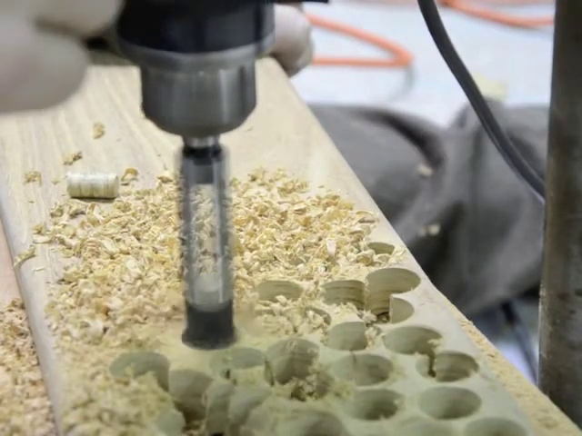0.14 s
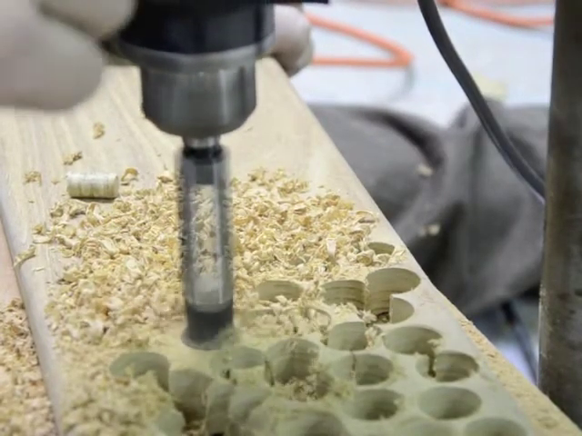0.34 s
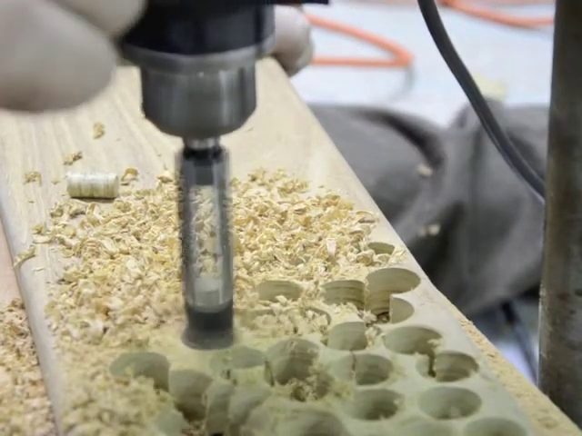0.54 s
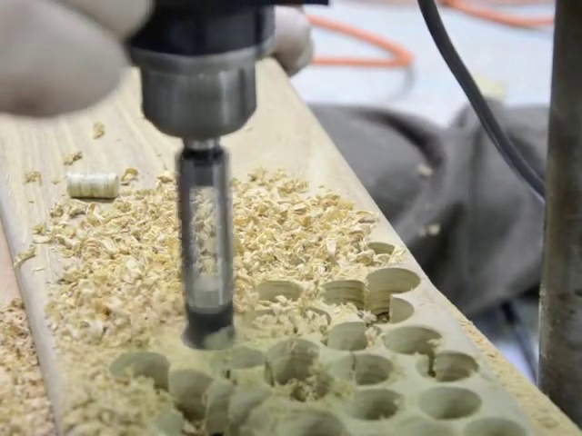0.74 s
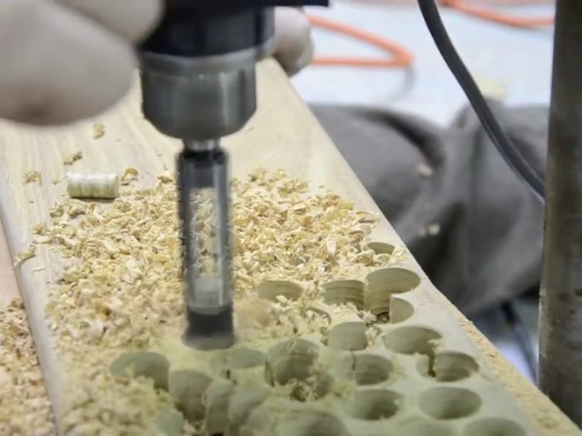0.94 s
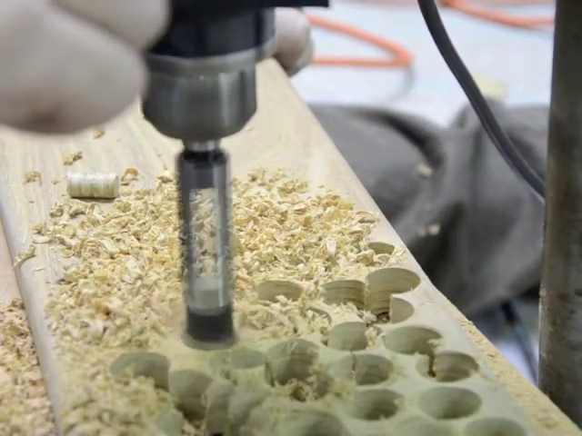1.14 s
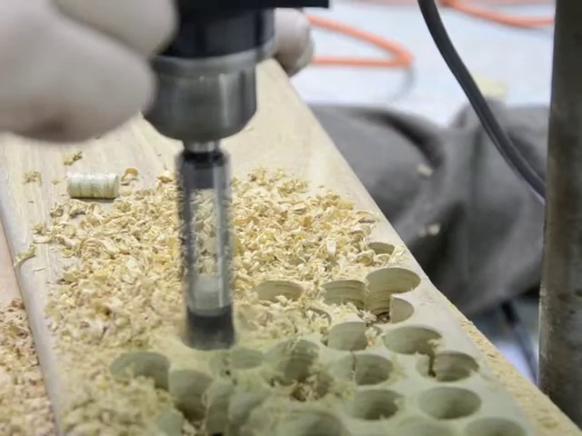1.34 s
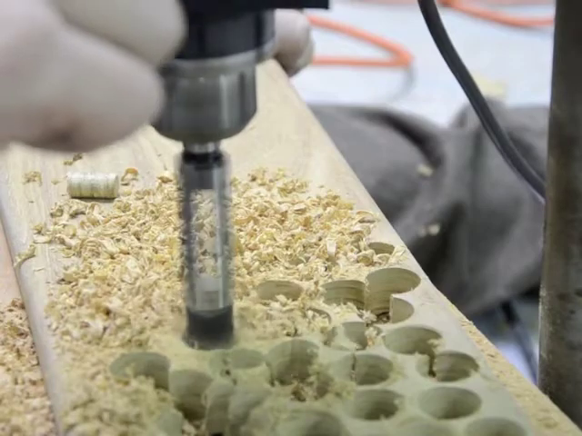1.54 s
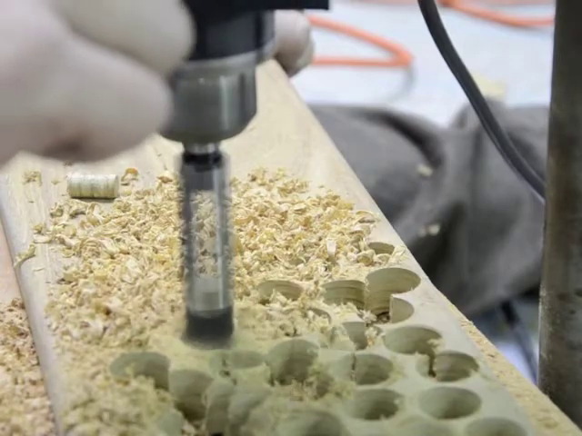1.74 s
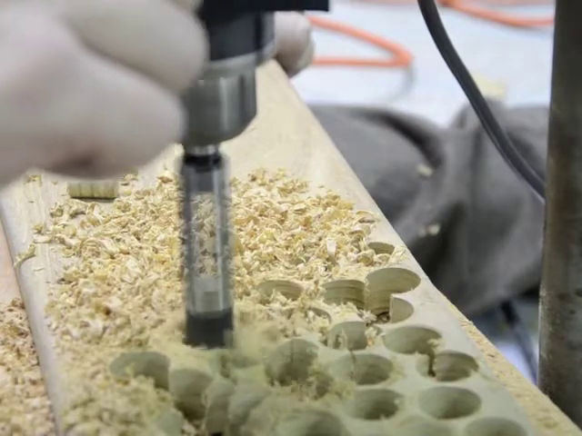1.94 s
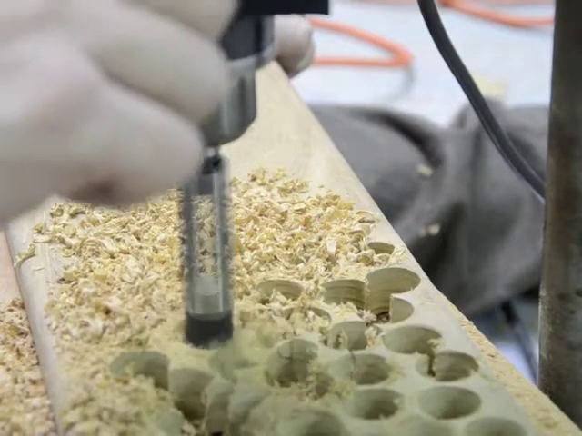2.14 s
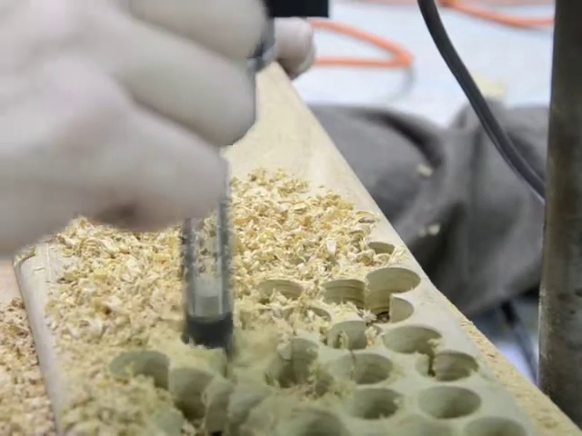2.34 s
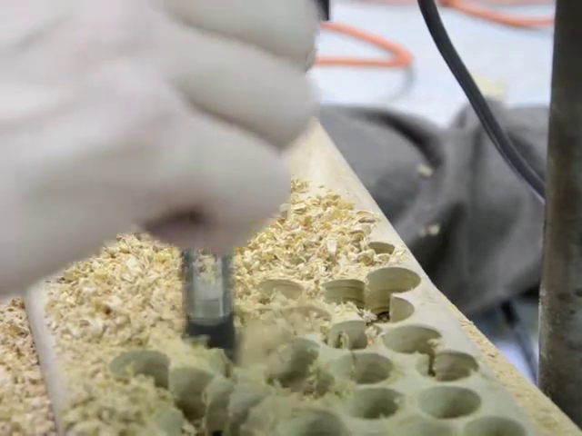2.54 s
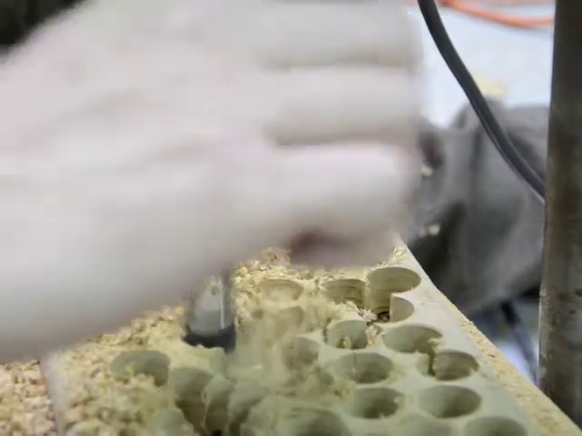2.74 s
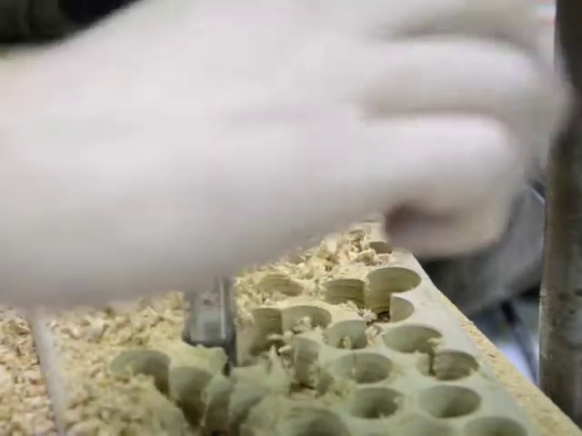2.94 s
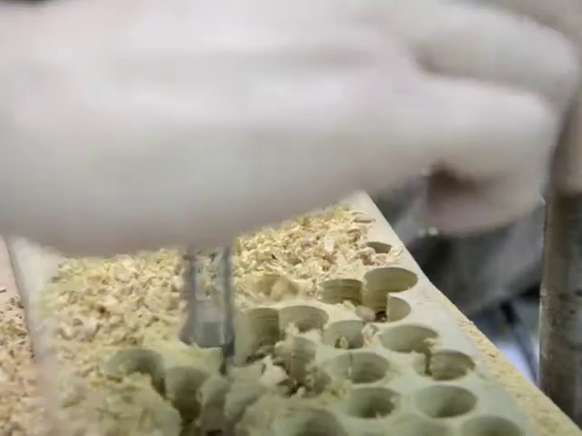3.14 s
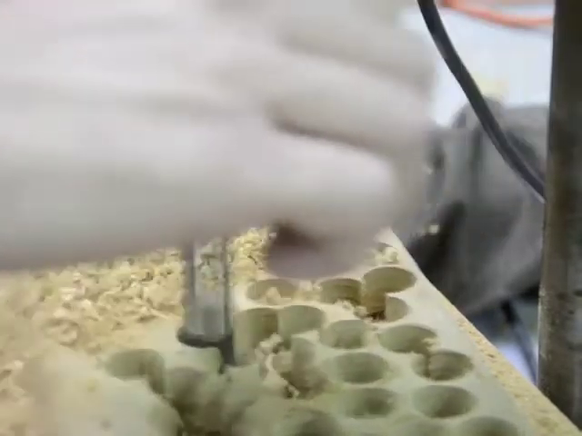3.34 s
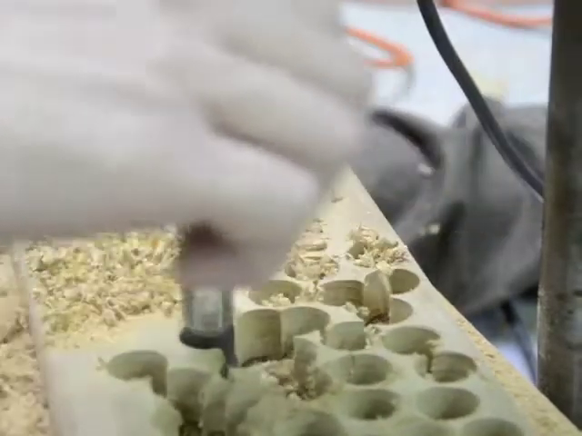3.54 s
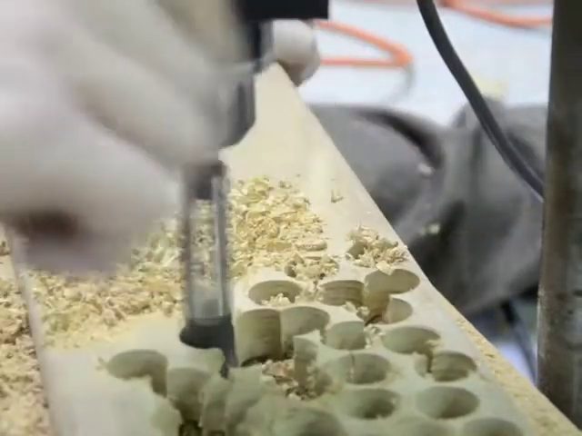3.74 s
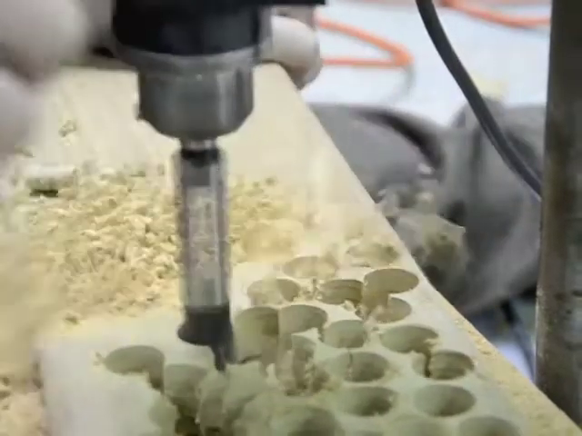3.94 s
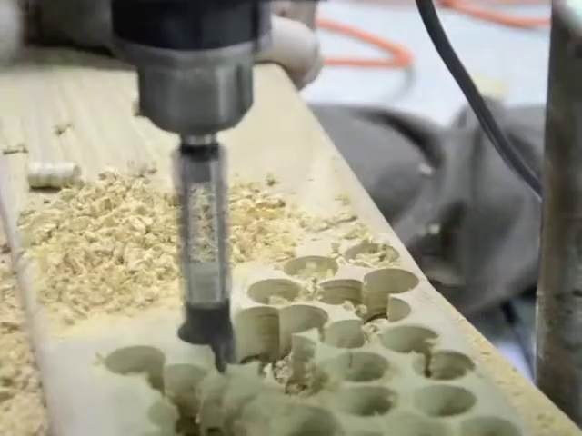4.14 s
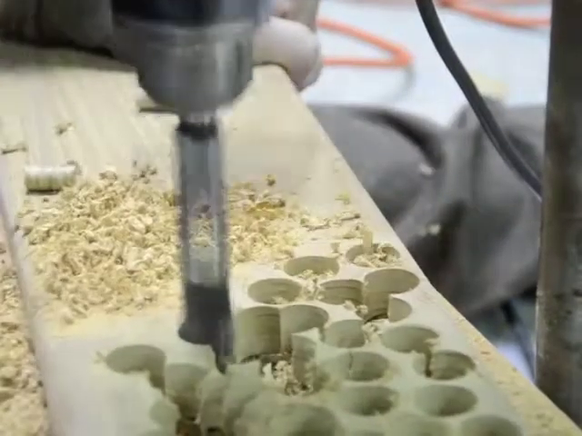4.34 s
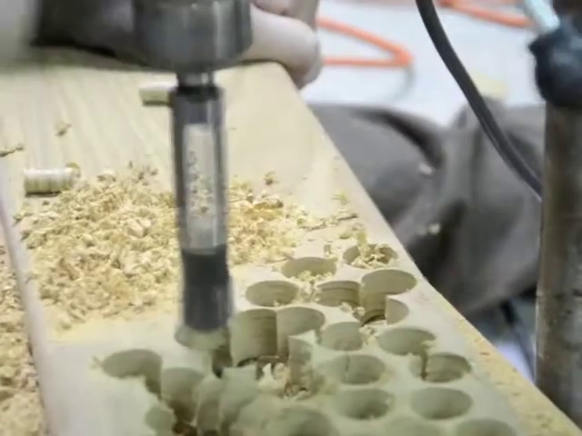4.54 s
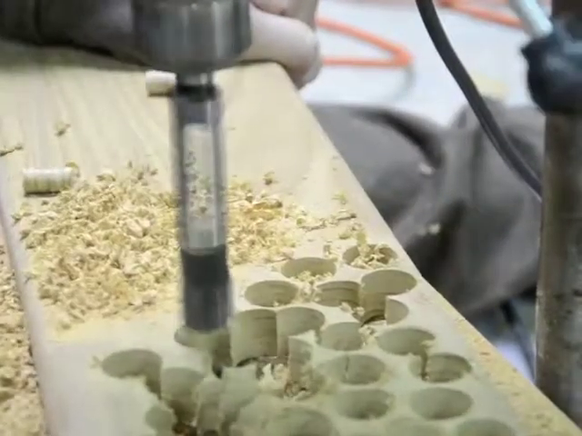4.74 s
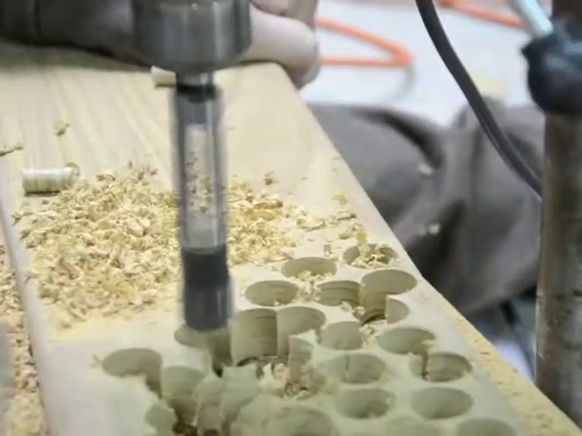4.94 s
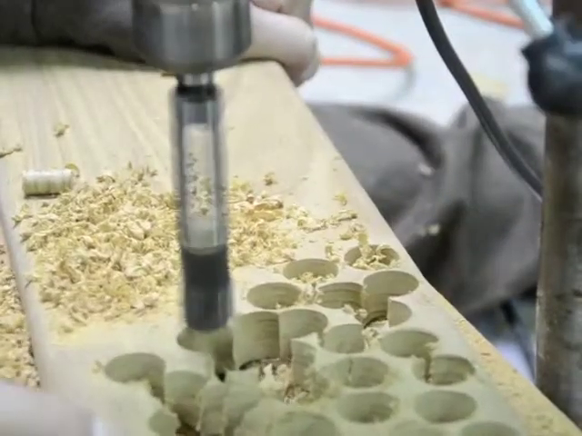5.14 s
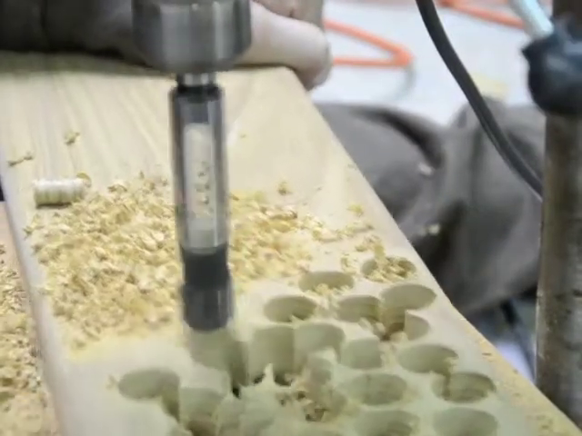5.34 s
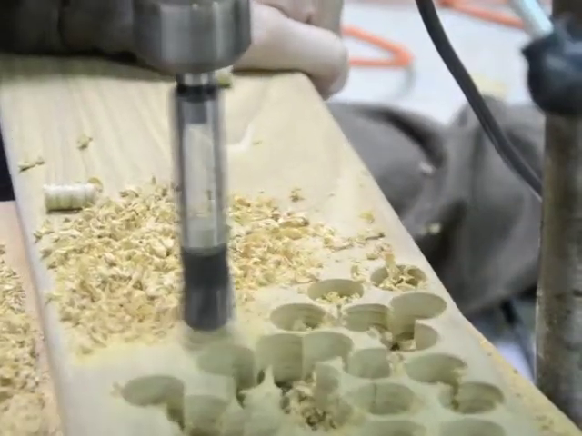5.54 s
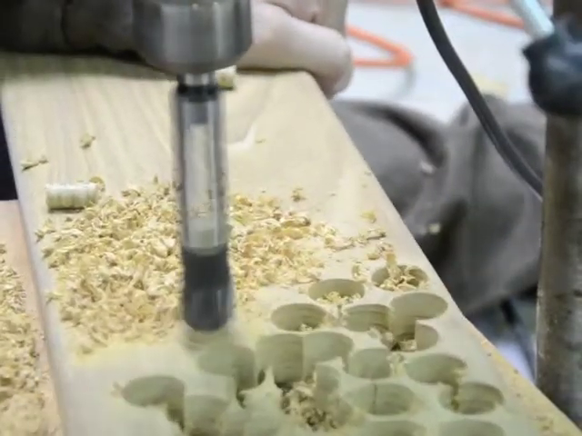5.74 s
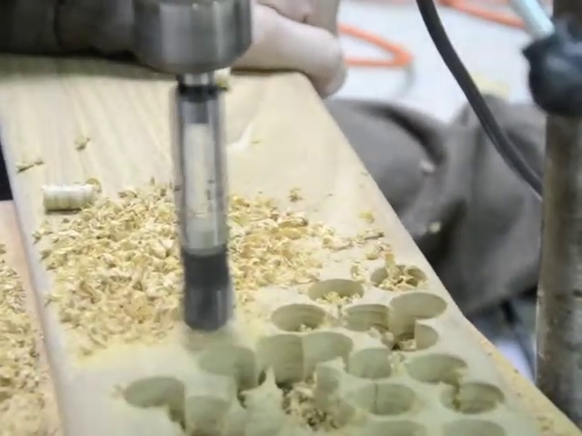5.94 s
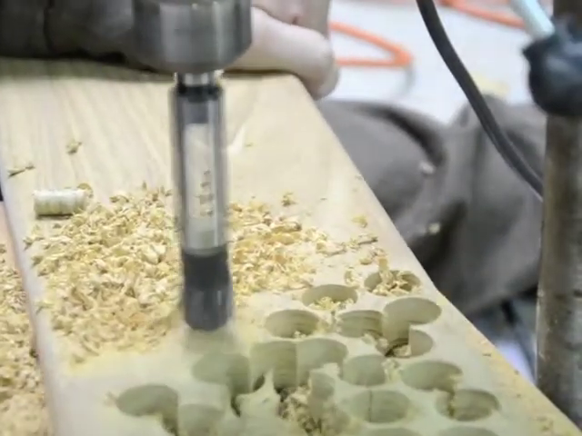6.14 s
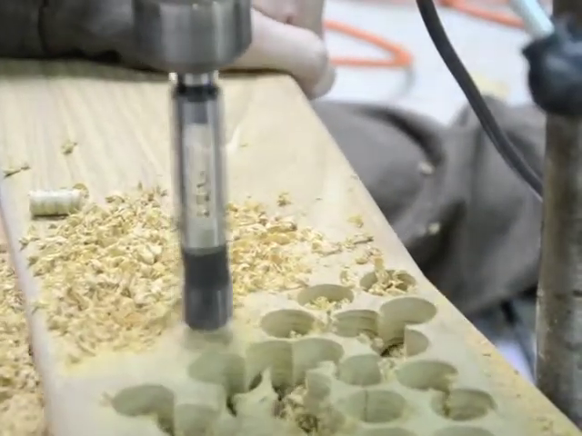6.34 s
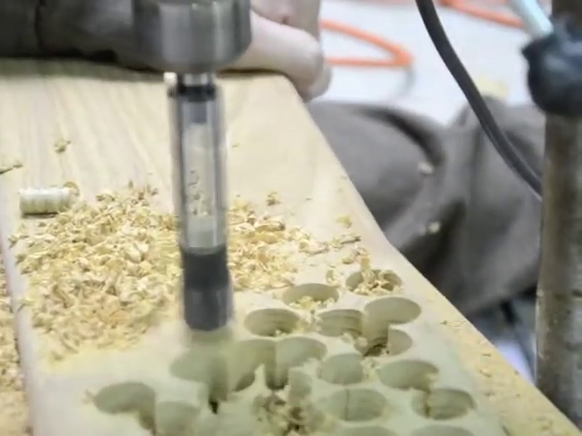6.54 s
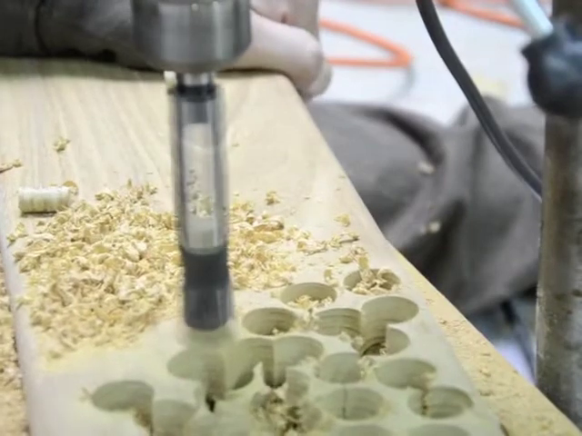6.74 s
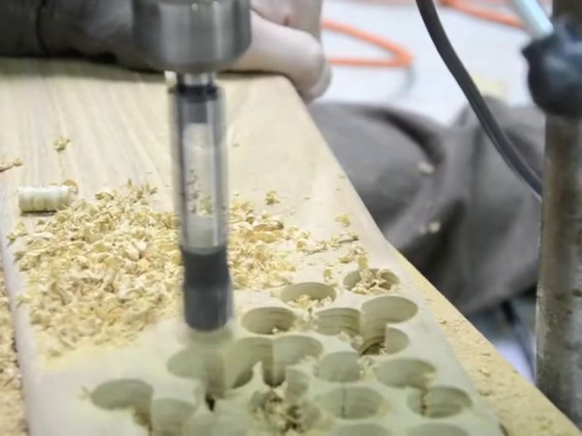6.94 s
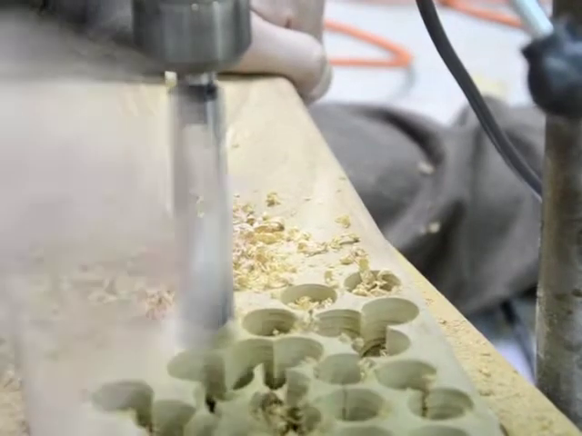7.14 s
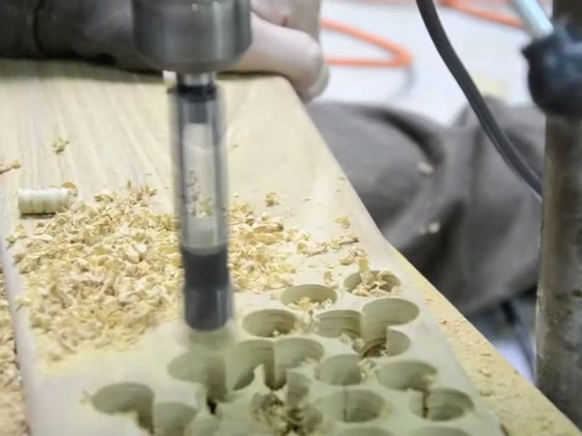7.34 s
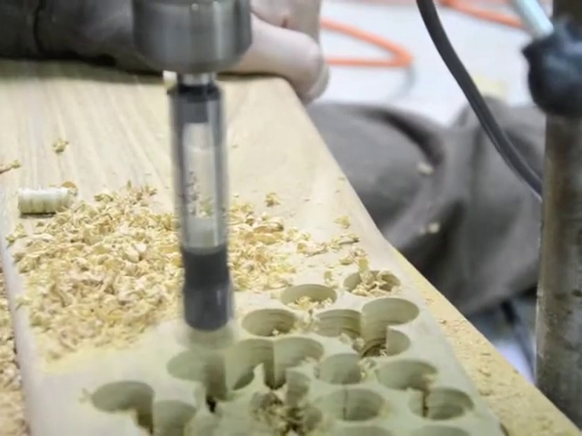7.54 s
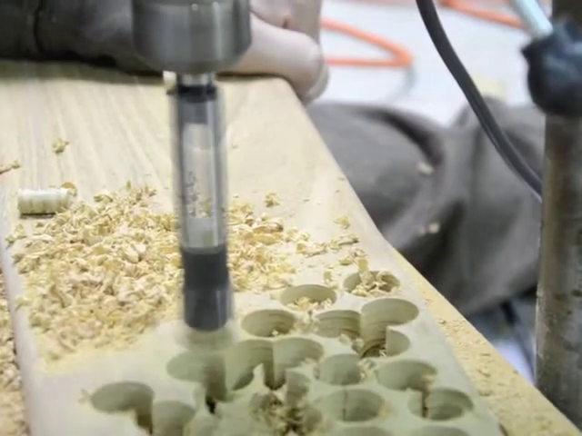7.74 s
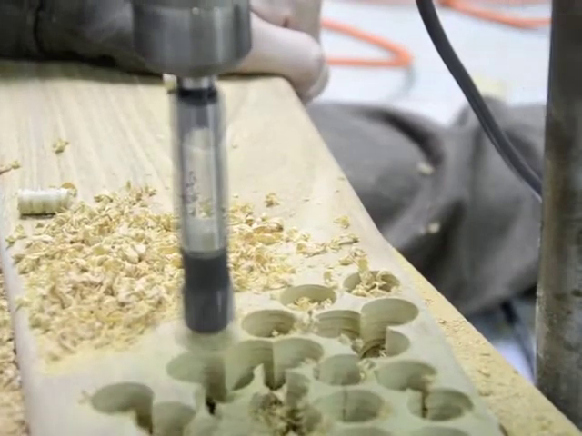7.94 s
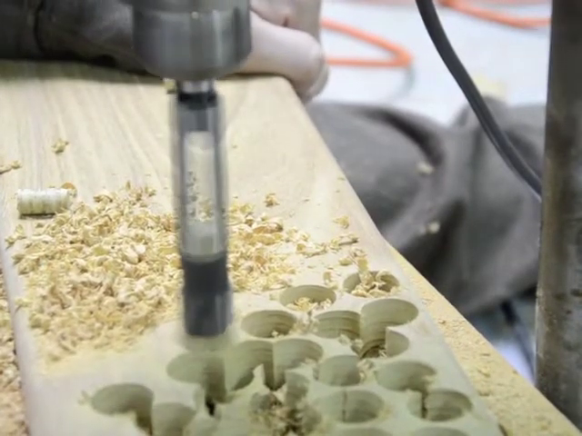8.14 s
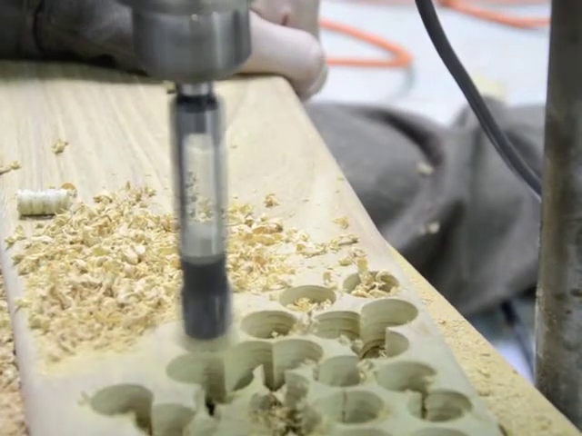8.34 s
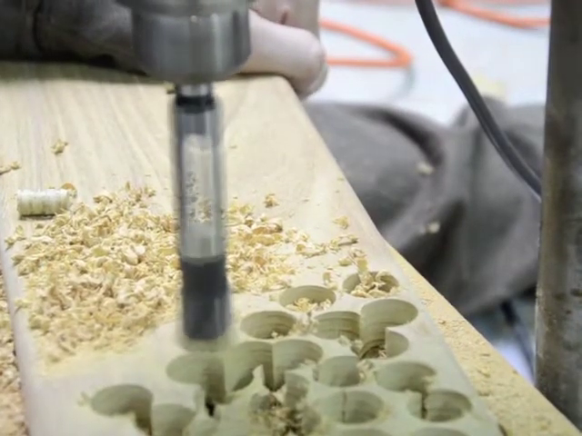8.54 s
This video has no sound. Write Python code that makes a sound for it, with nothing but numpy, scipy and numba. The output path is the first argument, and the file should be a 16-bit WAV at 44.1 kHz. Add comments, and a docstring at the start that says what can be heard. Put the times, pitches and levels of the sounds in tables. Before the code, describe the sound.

Rhythmic rasping of a bench drill cutting wood turns into loud juddering, then the humming spindle runs free, ticking and knocking.

```python
"""Drill press cutting a wooden plug

A small workshop, one microphone close to the bench. The motor hums and throbs as a plug cutter bores
into a board: it rasps once a turn, squeaks, then grabs and chatters in two loud fits that shake board
and table. Lifted clear, the spindle runs free, ticks and knocks in its play. Two dull thumps end it."""
import sys
import numpy as np
from scipy import signal
from scipy.fft import rfft, irfft
from scipy.io import wavfile
from numba import njit

SR = 44100
rng = np.random.default_rng(int(sys.argv[2]) if len(sys.argv) > 2 else 0)


def persist_wave(psi):
    """Save psi, clipped to +-1, as 16-bit WAV."""
    counts = np.round(np.clip(psi, -1, 1) * 32767).astype(np.int16)
    wavfile.write(sys.argv[1], SR, np.atleast_2d(counts).T)


N = 382788
T = np.arange(N) / SR


# steady cutting, close by: time_s, rasp_db, dust_db
CUT_LEVELS = [(0, -36, -48.5), (.6, -34.5, -49.5), (1.2, -32.5, -50.5), (1.8, -31.5, -53.5),
              (2.0, -31, -53), (2.12, -35.5, -49), (2.25, -43, -54), (2.5, -38, -48.5), (2.9, -53, -71),
              (3.1, -59, -77), (4.7, -80, -93), (8.68, -124, -100)]
# rasp of the teeth: pitch_hz, level_db
RASP_SPECTRUM = [(100, -50), (380, -36), (650, -9), (800, -0.5), (1100, -6.5), (1350, 4), (1700, -2.5),
                 (2100, -3.5), (2600, -6), (3300, -17), (4400, -23.5), (5260, -21), (8000, -32.5),
                 (11400, -35), (16000, -44.5)]
# bore resonances, sinking as the cut deepens: time_s, first_hz, second_hz, third_hz
BORE_PITCHES = [(0, 1050, 1580, 2030), (1.2, 1066, 1516, 2010), (1.6, 1040, 1470, 1820),
                (1.8, 960, 1470, 1820), (2.0, 716, 1130, 1890), (2.6, 714, 1170, 1640)]
# the same three resonances: width_hz, gain_db
BORE_RINGS = [(90, 12), (110, 3.5), (130, 6)]
# fine dust hissing out of the cut: pitch_hz, level_db
DUST_SPECTRUM = [(100, -30), (1760, -22), (3000, -4.5), (4200, -15.5), (6000, -16), (8300, -20),
                 (9300, -22.5), (10500, -25.5), (11500, -24), (12400, -29), (14000, -31.5), (16000, -39)]
# ringing of the steel cutter: pitch_hz, width_hz, gain_db
CUTTER_RINGS = [(2850, 49, -11), (3140, 120, -11), (5260, 97, -7), (8100, 56, 5), (9580, 120, 0),
                (11400, 180, 0.5), (11980, 550, 0)]
TEETH = 4

def cutting(turn, bite_db=7.0, tooth_db=-0.5, split_hz=1300, first_dust_db=6.5, second_dust_db=7.5):
    """Each tooth scrapes the bore; once a turn the rasp bites brightly and dust spurts twice."""
    rasp_db, dust_db = curves(CUT_LEVELS)
    bore = [(hz, width, db) for hz, (width, db) in zip(curves(BORE_PITCHES), BORE_RINGS)]
    rasp = ring(colour(grains(5000, 3.2), RASP_SPECTRUM), bore)
    dull = rolloff(rasp, split_hz, "low", order=3)
    scrape = dull * undb(tooth_db * lobe(TEETH * turn, .7, 0.21))
    bite = (rasp - dull) * undb(bite_db * lobe(turn, 0.05, 0.075))
    dust = ring(colour(grains(4000, 1.9), DUST_SPECTRUM), CUTTER_RINGS)
    spurts = undb(first_dust_db * lobe(turn, .03, .085) + second_dust_db * lobe(turn, 0.57, 0.18))
    return unit(scrape + bite) * undb(rasp_db) + unit(dust * spurts) * undb(dust_db)


# grabs of the cutter: start_s, attack_s, length_s, release_s, shake_db, splinter_db
GRABS = [(2.643, 0.012, 0.048, 0.03, -19.5, -44), (2.71, 0.034, 0.27, 0.014, -33.5, -64),
         (3.099, 0.0025, 0.075, 0.012, -14, -18.5), (3.244, 0.0031, 0.017, 0.037, -14.5, -32),
         (3.281, 0.015, 0.13, 0.029, -15, -24), (3.767, 0.037, 0.097, 0.022, -19.5, -34),
         (3.872, 0.045, 0.079, 0.011, -14.5, -46), (3.962, 0.01, 0.15, 0.03, -16, -41),
         (4.27, 0.015, 0.19, 0.065, -15, -31.5)]
# the board hammering on the table: pitch_hz, level_db
BOARD_SPECTRUM = [(24, -72), (40, -40), (110, -23), (185, -16.5), (258, -16), (339, -11.5), (393, -5),
                  (455, 3), (561, -4), (854, -3), (1150, -10.5), (1380, -6.5), (1710, -14.5), (3000, -27.5),
                  (4380, -24.5), (6000, -49), (7800, -67), (13200, -120)]
# ringing of board and table: pitch_hz, width_hz, gain_db
TABLE_RINGS = [(385, 11.7, 8), (417, 63, 4.5), (864, 35, -3), (1064, 83, 0), (1453, 350, -0.5),
               (1965, 154, 4)]
# wood splintering: pitch_hz, level_db
SPLINTER_SPECTRUM = [(100, -27), (1760, -17.5), (3000, -1.5), (4110, -14), (4320, -15), (5630, -18.5),
                     (6760, -20), (8110, -18), (10600, -20.5), (11600, -21.5), (15100, -35), (16000, -48)]

def chatter(turn, shake_db=-7.0, splinter_db=-10.5, chip_db=-10.5, splinter_release_s=0.007):
    """The cutter grabs and hammers the board on the table; chips tear out, splinters ring the steel."""
    shaking = splintering = 0
    for start_s, attack_s, length_s, release_s, board_db, fibre_db in GRABS:
        shaking += undb(board_db) * envelope(start_s, attack_s, length_s, release_s)
        splintering += undb(fibre_db) * envelope(start_s, attack_s, length_s, splinter_release_s)
    blow, crack = tooth_catches(turn, shaking)
    judder = unit(undb(2.0 * walk(170)))
    hammer = grains(2200, 1.24) * judder * shaking * undb(shake_db)
    chips = colour(grains(600, 2.5), RASP_SPECTRUM) * shaking * undb(chip_db)
    fibre_clumps = grains(420, 2.5) * judder * unit(undb(2.0 * walk(260)))
    splinters = fibre_clumps * splintering * undb(splinter_db) + grains(9000, 7.7) * crack
    wood = ring(colour(hammer, BOARD_SPECTRUM) + caught_wood(blow), TABLE_RINGS)
    return wood + chips + ring(colour(splinter_ring(splinters), SPLINTER_SPECTRUM), CUTTER_RINGS)


# the hardest blows of catching teeth: start_s, blow_db, crack_db, pitch_hz
HARD_CATCHES = [(2.1, -13.5, -60, 820), (2.534, -11.5, -32.5, 1300), (2.67, -4.5, -43, 1320),
                (2.739, -12.5, -30.5, 925), (2.837, -14, -31, 1340), (2.907, -15, -38, 1020),
                (2.932, -11, -33, 1040), (3.026, 1, -23.5, 1090), (3.035, -11, -34, 1330),
                (3.097, 1, -29, 1410), (3.12, -0.5, -27, 1410), (3.148, 1, -26, 1030),
                (3.16, -14, -30, 830), (3.192, 2.5, -22, 1740), (3.238, 1.5, -24, 1390),
                (3.293, -15, -30, 1040), (3.342, 0, -31, 1360), (3.408, -7.5, -27.5, 870),
                (3.777, -15, -33, 905), (3.803, -4, -27, 865), (3.829, -11, -32, 870),
                (3.852, -8, -41, 900), (3.871, -0.5, -18, 1220), (3.897, -2.5, -30, 780),
                (3.912, -1.5, -42, 840), (3.924, -7, -32, 1320), (3.945, -4, -38, 860),
                (3.969, -7, -24.5, 790), (4.022, -13, -37, 820), (4.039, -4, -26.5, 910),
                (4.067, -1.5, -23.5, 1410), (4.135, -1, -26.5, 1820), (4.16, -2, -27.5, 1350),
                (4.181, -3.5, -26, 1400), (4.276, -12.5, -42, 810), (4.308, -8, -36, 874),
                (4.327, -7, -29, 1000), (4.351, -2, -28, 1090), (4.417, -7.5, -25.5, 980),
                (4.446, -5, -27, 1530), (4.465, 1.5, -25.5, 1770), (4.491, -19, -23.5, 900)]

def tooth_catches(turn, shaking, crack_db=-24, scatter_db=2.5, jitter_s=0.0018):
    """Force of blows and cracks: the hardest catches, and a lesser one per tooth as the board shakes."""
    blow_shape = dict(decay_s=0.0087, rise_s=0.00062)
    crack_shape = dict(decay_s=0.0079, rise_s=0.00023)
    passes = moments(turn, 1 / TEETH, 0.88)[:-1]
    late, blow_chance, crack_chance = rng.standard_normal((len(passes), 3)).T
    passes = np.clip(passes + jitter_s * late, 0, T[-1])
    start_s, hard_blow_db, hard_crack_db, _ = np.transpose(HARD_CATCHES)
    lesser_blows = shaking * blows(passes, scatter_db * blow_chance, **blow_shape)
    lesser_cracks = shaking * blows(passes, crack_db + scatter_db * crack_chance, **crack_shape)
    return (np.maximum(blows(start_s, hard_blow_db, **blow_shape), lesser_blows),
            np.maximum(blows(start_s, hard_crack_db, **crack_shape), lesser_cracks))


# a short blow, which hardly moves the table: pitch_hz, level_db
BLOW_SPECTRUM = [(40, -68), (250, -11.5), (420, -3), (600, -2), (950, 2.5), (1500, -5), (2100, -7),
                 (3200, -10.5), (4300, -25.5), (7000, -50), (16000, -80)]

def caught_wood(blow, ring_db=2.5, width_hz=280.0, blow_db=-14.0):
    """Each blow rings the wood at the pitch of the latest hard catch."""
    start_s, _, _, pitch_hz = np.transpose(HARD_CATCHES)
    latest = np.maximum(np.searchsorted(start_s, T) - 1, 0)
    struck = colour(grains(5000, 2.0) * blow * undb(blow_db), BLOW_SPECTRUM)
    return struck + undb(ring_db) * bandpass(struck, pitch_hz[latest], width_hz)


def splinter_ring(x, centre_hz=5000, spread_octaves=0.65, width_hz=1100.0, ring_db=4):
    """Splinters of unequal length: each rings briefly at a pitch of its own."""
    pitch_hz = np.clip(centre_hz * 2 ** (spread_octaves * walk(160)), 1500, 14000)
    return x + undb(ring_db) * bandpass(x, pitch_hz, width_hz)


# single brittle fibres breaking: start_s, level_db
FIBRE_SNAPS = [(1.8789, -16), (2.039, -22), (2.057, -18.5), (2.0972, -5), (2.523, -14), (2.536, -18),
               (3.673, -34), (3.697, -26), (3.872, -14), (3.973, -7.5), (4.042, -15)]
# their dry crack: pitch_hz, level_db
SNAP_SPECTRUM = [(200, -10), (900, 19.5), (2600, 6), (4500, 1.5), (7000, 5.5), (9000, -3.5), (12000, -4.5),
                 (16000, -13)]

def snaps(snap_db=-1):
    """A fibre lets go within a millisecond or two, too fast to move the board."""
    start_s, level_db = np.transpose(FIBRE_SNAPS)
    burst = blows(start_s, level_db + snap_db, decay_s=.0012, rise_s=.0005)
    return colour(grains(15000, 1) * burst, SNAP_SPECTRUM)


# the cutter wall squeaking: peak_s, pitch_hz, level_db
WALL_SQUEAKS = [(1.635, 8100, -39), (1.73, 8230, -33), (1.829, 8180, -35.5), (2.095, 8100, -37),
                (2.195, 8100, -46)]

def squeaks(half_width_s=0.0048, rough_hz=90):
    """The steel tube sings briefly as it rubs the plug."""
    wobble_hz = rough_hz * walk(900)
    out = 0
    for peak_s, hz, db in WALL_SQUEAKS:
        swell = undb(db) * np.exp(-((T - peak_s) / half_width_s) ** 2)
        out += swell * np.sin(2 * np.pi * np.cumsum(hz + wobble_hz) / SR)
    return out


TUBE_HZ = 8260
# steel singing in the wood, later loose, broad scrapes: start_s, length_s, pitch_hz, width_hz, level_db
STEEL_RUBS = [(2.73, .26, 3200, 200, -48), (4.32, 0.12, TUBE_HZ, 130, -50), (7.85, 0.17, 2350, 1600, -49),
              (7.2, 0.3, 12000, 5900, -67)]

def rubs(attack_s=0.026, release_s=0.044, uneven_db=3.5):
    """Each sliding contact keeps one resonance sounding, unevenly."""
    out = 0
    for start_s, length_s, hz, width_hz, db in STEEL_RUBS:
        friction = band(grains(2800, 4.4), hz, width_hz) * undb(db + uneven_db * walk(45))
        out += friction * envelope(start_s, attack_s, length_s, release_s)
    return out


# looseness of the spindle: time_s, rattle_db
SPINDLE_PLAY = [(0, -53), (2.2, -47.5), (4.7, -45.5), (6.2, -43), (7.7, -43), (7.95, -37.5), (8.1, -46.5),
                (8.68, -45.5)]
# tapping of the splines: pitch_hz, level_db
RATTLE_SPECTRUM = [(410, -23.5), (700, 6), (830, -1.5), (922, 13), (984, -27.5), (1020, 17), (1090, -3.5),
                   (1380, 5.5), (2130, -28.5), (2730, -5), (5690, -32.5), (10500, -34), (12800, -39),
                   (16000, -57)]

def spline_rattle(turn, quarter_db=(0, -9, -12, -4), scatter_db=2.5, decay_turns=0.16):
    """The splines tap four times a turn, unequally."""
    quarter = (4 * turn).astype(int)
    turns_since_tap = turn - quarter / 4
    tap_db = np.array(quarter_db)[quarter % 4] + scatter_db * rng.standard_normal(512)[quarter]
    taps = unit(undb(tap_db) * np.exp(-turns_since_tap / decay_turns))
    looseness = undb(curves(SPINDLE_PLAY)[0])
    return colour(grains(6000, 6.8) * taps * looseness, RATTLE_SPECTRUM)


# the hardest knocks of the free spindle: start_s, knock_db, tick_db
HARD_KNOCKS = [(5.016, -19, -49), (5.203, -17, -49), (5.355, -23, -56), (5.462, -22, -53),
               (5.674, -21.5, -53), (5.744, -23.5, -44), (5.86, -17.5, -43.5), (5.931, -18, -43),
               (6.049, -20.5, -49), (6.123, -19.5, -53), (6.235, -14, -42), (6.402, -21, -45),
               (6.589, -21, -45), (6.804, -29, -59), (6.872, -17.5, -43), (7.179, -27, -60),
               (7.244, -16.5, -49), (7.364, -21.5, -56), (7.623, -21.5, -48), (7.741, -23, -55),
               (7.808, -21, -50), (7.879, -19, -52), (7.953, -18, -47)]
# two knocks in each swing through the play: angle_turns, gain_db
KNOCKS_PER_SWING = [(1, 15), (1.74, 13.5)]
# a knock of the quill, the sleeve round the spindle: pitch_hz, level_db
KNOCK_SPECTRUM = [(300, -20.5), (900, -15), (1400, 6), (1900, -4.5), (2600, -15.5), (4000, -31.5),
                  (5200, -34), (9000, -34.5), (15000, -60)]
# ringing of the quill: pitch_hz, width_hz, gain_db
QUILL_RINGS = [(1380, 27, -10), (1430, 25, -20), (1570, 36, -5), (1820, 34, -11)]

def knocking(turn, load, swing_turns=2, scatter_db=1.5, knock_db=-11, decay_s=0.014, rise_s=0.0014):
    """Without load the swinging spindle knocks in a limping rhythm and rings the quill."""
    looseness = (1 - load) * undb(curves(SPINDLE_PLAY)[0])
    start_s, hard_db, _ = np.transpose(HARD_KNOCKS)
    force = blows(start_s, hard_db, decay_s, rise_s)
    for angle, db in KNOCKS_PER_SWING:
        passes = moments(turn, swing_turns, angle)
        level_db = db + scatter_db * rng.standard_normal(128)[:len(passes)]
        force = np.maximum(force, looseness * blows(passes, level_db, decay_s, rise_s))
    return ring(colour(grains(6000, 8.0) * force * undb(knock_db), KNOCK_SPECTRUM), QUILL_RINGS)


# steel ticking on steel: pitch_hz, level_db
TICK_SPECTRUM = [(1000, -19.5), (4000, -19), (5100, 5.5), (6000, -4), (10500, -3), (12500, -20),
                 (16000, -36)]
# high ringing of spindle and bearings: pitch_hz, width_hz, gain_db
STEEL_RINGS = [(4700, 110, -2), (5100, 90, -2), (6160, 140, -6), (6740, 84, 1), (7000, 64, 2),
               (8180, 160, 2.5), (9870, 230, -1), (11700, 300, 3), (13000, 250, -3)]

def ticks(turn, load, light_db=-57.5, scatter_db=2.5, decay_s=0.0028, rise_s=0.00037, tick_db=-2.0):
    """The free spindle ticks lightly twice a turn, and louder with each hard knock."""
    start_s, _, hard_db = np.transpose(HARD_KNOCKS)
    passes = moments(turn, .5, .23)
    level_db = light_db + scatter_db * rng.standard_normal(len(passes))
    light = (1 - load) * blows(passes, level_db, decay_s, rise_s)
    force = np.maximum(blows(start_s, hard_db + tick_db, decay_s, rise_s), light)
    return ring(colour(grains(12000, 1.5) * force, TICK_SPECTRUM), STEEL_RINGS)


# two thumps at the end: start_s, level_db
BOARD_THUMPS = [(8.421, -13.5), (8.517, -19.5)]
# their dull wooden tone: pitch_hz, level_db
THUMP_SPECTRUM = [(100, -46), (300, -29), (440, 7), (650, -4), (980, 8), (1500, -2), (2100, -10),
                  (3000, -13), (5000, -26), (10000, -38), (16000, -53)]

def thumps(decay_s=0.0047, rise_s=0.0016):
    """Soft blows on the board ring the table."""
    force = blows(*np.transpose(BOARD_THUMPS), decay_s, rise_s)
    return ring(colour(grains(7000, 0.55) * force, THUMP_SPECTRUM), TABLE_RINGS)


# loose dust on the near and far side of the cutter's path: time_s, near_db, far_db
BRUSH_LEVELS = [(0, -100, -100), (4.4, -100, -100), (4.5, -59, -69), (4.62, -60, -65), (5.0, -64, -71),
                (5.6, -66, -67), (6.2, -70, -72), (6.9, -65, -61), (7.6, -70, -69), (8.2, -73, -68),
                (8.68, -97, -94)]

def brushing(turn, pitch_hz=13400, width_hz=5200, arc_turns=0.11):
    """The lifted cutter brushes through dust: two thin, unequal swishes a turn that ring the steel."""
    near_db, far_db = curves(BRUSH_LEVELS)
    touch = undb(near_db) * lobe(turn, .77, arc_turns) + undb(far_db) * lobe(turn, 0.28, arc_turns)
    uneven = unit(undb(3.5 * walk(21)))
    swish = ring(band(grains(2500, 3), pitch_hz, width_hz), STEEL_RINGS)
    return unit(swish) * touch * uneven


# magnetic hum, its rotor sidebands and the slot tones: free_hz, loaded_hz, free_db, loaded_db
HUM_TONES = [(200, 200, -51.7, -56.5), (242.6, 236.5, -62, -72), (375.2, 375.7, -55, -58),
             (400, 400, -45.5, -49), (442.6, 436.5, -38.5, -49), (475.2, 475.7, -39, -40.5),
             (500, 500, -30.5, -26), (524.8, 524.3, -53, -48), (600, 600, -49, -53), (945, 931, -50, -50),
             (1045, 1031, -45, -47), (1145, 1131, -46.5, -56), (1245, 1231, -50.5, -60)]
# swell of the even magnetic hum: time_s, gain_db
EVEN_HUM_SWELL = [(0, 0.5), (6.8, 0.5), (7.5, -1), (8.35, 3), (8.55, 5), (8.68, 4)]
# fan, belt and bearings: pitch_hz, level_db
RUSH_SPECTRUM = [(30, -28), (80, -14), (130, -16), (260, -16), (340, -13.5), (400, -1.5), (460, 10),
                 (570, -4), (900, -2), (1180, -10.5), (1400, -9.5), (2000, -13.5), (2900, -23),
                 (4200, -36.5), (11000, -52), (15500, -53)]

def motor(load, even_hum_hz=200, waver_db=-1.1, rush_db=-35.0, flutter_db=1.0):
    """Hum and slot tones beat against each other over the rush of fan, belt and bearings."""
    swell_db, = curves(EVEN_HUM_SWELL)
    hum = 0
    for free_hz, loaded_hz, free_db, loaded_db in HUM_TONES:
        pitch_hz = free_hz + load * (loaded_hz - free_hz)
        phase = 2 * np.pi * (np.cumsum(pitch_hz) / SR + rng.random())
        level_db = free_db + load * (loaded_db - free_db) + waver_db * walk(6.4)
        if free_hz % even_hum_hz == 0:
            level_db += swell_db
        hum += np.sqrt(2) * undb(level_db) * np.sin(phase)
    rush = ring(colour(rng.standard_normal(N), RUSH_SPECTRUM), STEEL_RINGS)
    return hum + rush * undb(rush_db + flutter_db * walk(40))


def frame(x, ring_db=-9, ring_s=0.0048, above_hz=1200):
    """Casting, column and table add a short ring of countless close modes."""
    t = T[:SR // 10]
    dense = rolloff(rng.standard_normal(len(t)), above_hz, "high")
    return x + undb(ring_db) * convolve(x, dense * np.sqrt(t) * np.exp(-t / ring_s))


def workshop(x, wet_db=-9, low_t60_s=0.66, high_t60_s=0.34, split_hz=3500, build_s=0.0084):
    """The small room's diffuse echo behind the close sound; its treble dies sooner."""
    t = T[:SR]
    low = rolloff(rng.standard_normal(SR), split_hz, "low") * undb(-60 * t / low_t60_s)
    high = rolloff(rng.standard_normal(SR), split_hz, "high") * undb(-60 * t / high_t60_s)
    tail = (low + high) * (1 - np.exp(-t / build_s))
    return x + undb(wet_db) * convolve(x, tail)


def undb(db):
    """Decibels to gain."""
    return 10 ** (np.asarray(db) / 20)


def unit(x):
    """Scale to rms 1."""
    return x / np.sqrt(np.mean(x ** 2))


def curves(rows):
    """Each column of a table, joined by straight lines in time."""
    time_s, *columns = np.transpose(rows)
    return [np.interp(T, time_s, column) for column in columns]


def walk(rate_hz):
    """Random wandering with a spread near 1."""
    knots = rng.standard_normal(4096)
    return 1.2 * np.interp(T * rate_hz, np.arange(len(knots)), knots)


def grains(per_s, spread_db):
    """Random clicks of uneven size, rms 1."""
    clicks = (rng.random(N) < per_s / SR) * np.sign(rng.standard_normal(N))
    return unit(clicks * undb(spread_db * np.clip(rng.standard_normal(N), -2, 2)))


def blows(times_s, levels_db, decay_s, rise_s):
    """Contact force of single blows: a quick rise and a scraping decay."""
    force, t = np.zeros(N), T[:SR // 8]
    pulse = (1 - np.exp(-t / rise_s)) * np.exp(-t / decay_s)
    for start_s, db in zip(times_s, levels_db):
        i = int(start_s * SR)
        force[i:i + len(t)] += undb(db) * pulse[:N - i]
    return force


def envelope(start_s, attack_s, length_s, release_s):
    """Attack, hold, dying away."""
    attack = np.clip((T - start_s) / attack_s, 0, 1)
    return attack * np.exp(-np.maximum(T - start_s - length_s, 0) / release_s)


def moments(turn, every_turns, first_turn):
    """Times at which the spindle passes an angle, one every so many turns."""
    return np.interp(np.arange(first_turn, turn[-1], every_turns), turn, T)


def lobe(turn, angle, width_turns):
    """A smooth bump once a turn, as the spindle passes an angle."""
    return np.exp(-(((turn - angle + .5) % 1 - .5) / width_turns) ** 2)


def convolve(x, response):
    """Apply an impulse response scaled to unit energy."""
    return signal.oaconvolve(x, response / np.linalg.norm(response))[:N]


def rolloff(x, hz, kind, order=2):
    """Low-pass or high-pass filter."""
    return signal.sosfilt(signal.butter(order, hz, kind, fs=SR, output="sos"), x)


def colour(x, spectrum, size=4096):
    """Minimum-phase filter with a (pitch_hz, level_db) shape; keeps the power of white noise."""
    hz, db = np.transpose(spectrum)
    bins_hz = np.maximum(np.arange(size // 2 + 1) * SR / size, 1)
    gain = undb(np.interp(np.log(bins_hz), np.log(hz), db))
    cepstrum = irfft(np.log(gain))
    cepstrum[1:size // 2] *= 2
    cepstrum[size // 2 + 1:] = 0
    return convolve(x, irfft(np.exp(rfft(cepstrum))))


@njit
def bandpass(x, hz, width_hz):
    """State-variable resonance whose centre may move."""
    y, band_state, low_state = np.empty(len(x)), 0., 0.
    for i in range(len(x)):
        g, damping = np.tan(np.pi * hz[i] / SR), width_hz / hz[i]
        v = (band_state + g * (x[i] + 1e-18 - low_state)) / (1 + g * (g + damping))
        band_state = 2 * v - band_state
        low_state += 2 * g * v
        y[i] = damping * v
    return y


def ring(x, modes):
    """Add the ringing of (pitch_hz, width_hz, gain_db) modes to a sound."""
    return x + sum(undb(db) * bandpass(x, hz * np.ones(N), float(width)) for hz, width, db in modes)


def band(x, hz, width_hz):
    """A steep band of a sound, rms 1."""
    centre = hz * np.ones(N)
    return unit(bandpass(bandpass(x, centre, float(width_hz)), centre, float(width_hz)))


# load on the motor, 0 running free to 1 cutting hard: time_s, load
MOTOR_LOAD = [(0, 1), (1.9, 1), (2.2, .1), (3.0, .1), (3.1, .82), (4.5, .82), (4.7, 0), (8.68, 0)]

def scene(free_turn_hz=10.655, loaded_turn_hz=10.145, start_turn=.28):
    """Load slows motor and spindle; the turning spindle times the rasp, the catches and the rattle."""
    load, = curves(MOTOR_LOAD)
    turn = start_turn + np.cumsum(free_turn_hz + load * (loaded_turn_hz - free_turn_hz)) / SR
    work = frame(spline_rattle(turn) + knocking(turn, load) + cutting(turn) + chatter(turn) + thumps())
    work = work + squeaks() + rubs() + ticks(turn, load) + brushing(turn)
    return (motor(load) + workshop(work) + workshop(snaps(), wet_db=-14))[None]


def record(dry, low_hz=48, top_hz=15900):
    """The close microphone rounds the loudest peaks, thins the deep bass and cuts the top."""
    thin = rolloff(np.tanh(dry), low_hz, "high")
    return signal.sosfilt(signal.ellip(8, .2, 70, top_hz, fs=SR, output="sos"), thin)


dry = scene()
out = record(dry)
persist_wave(out)
```